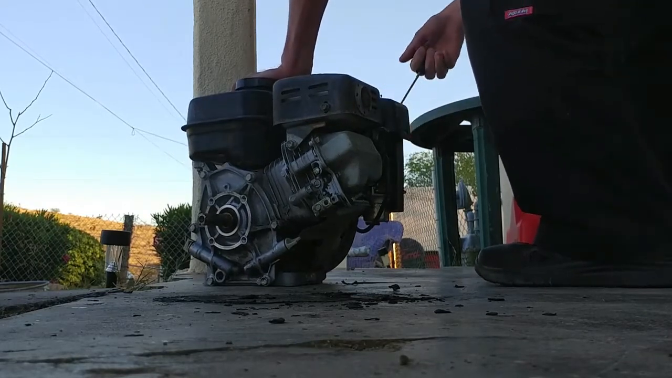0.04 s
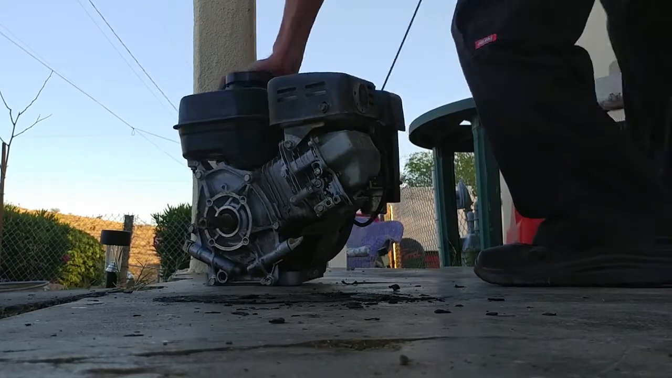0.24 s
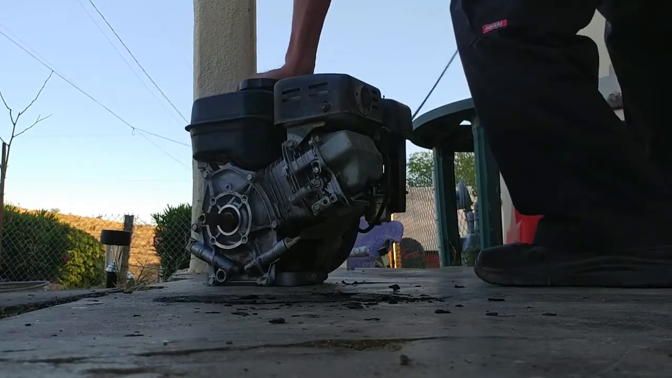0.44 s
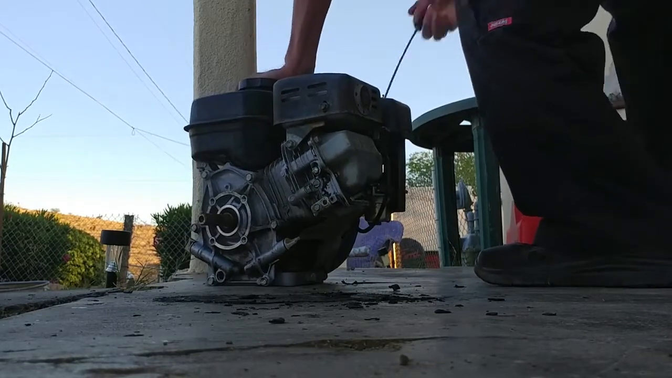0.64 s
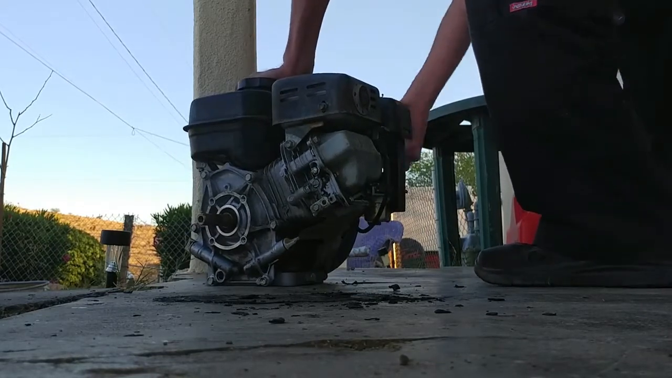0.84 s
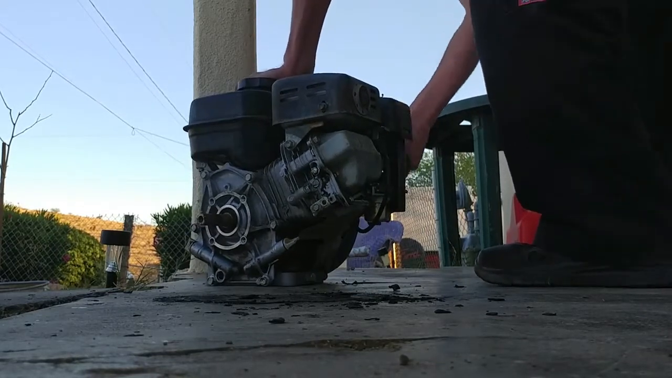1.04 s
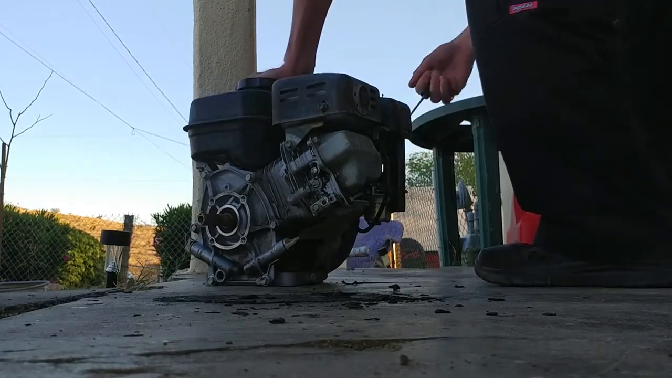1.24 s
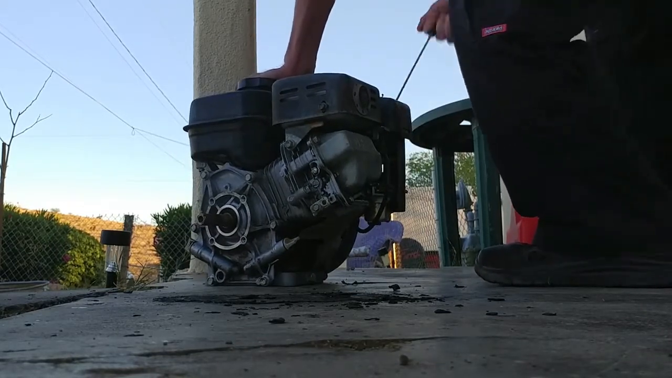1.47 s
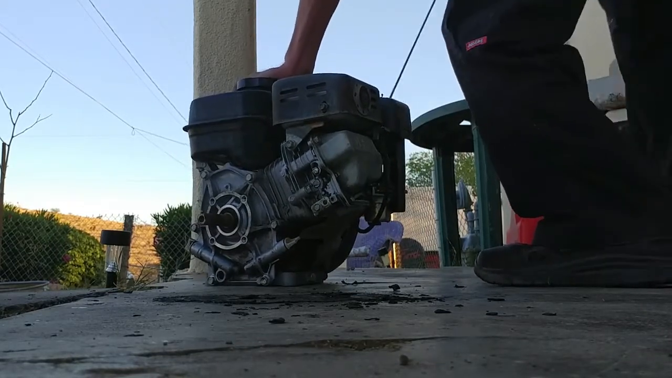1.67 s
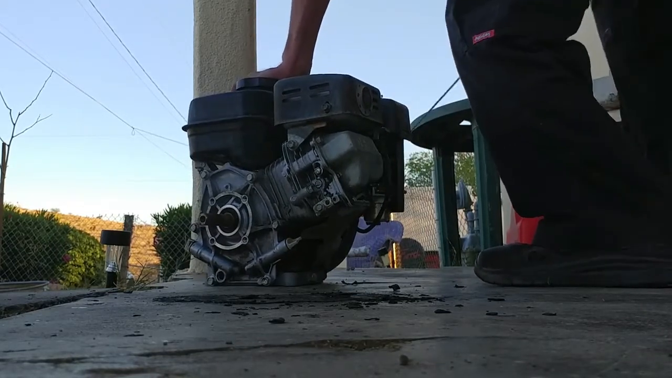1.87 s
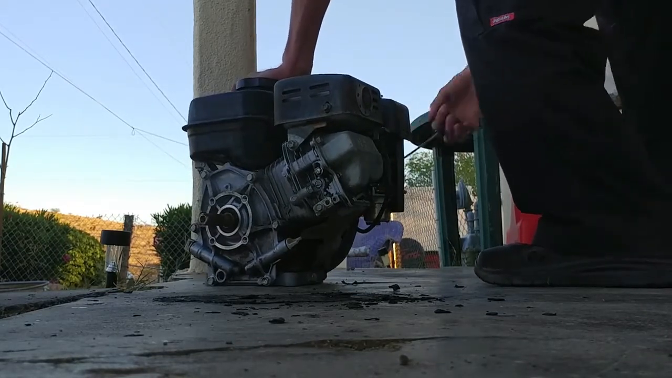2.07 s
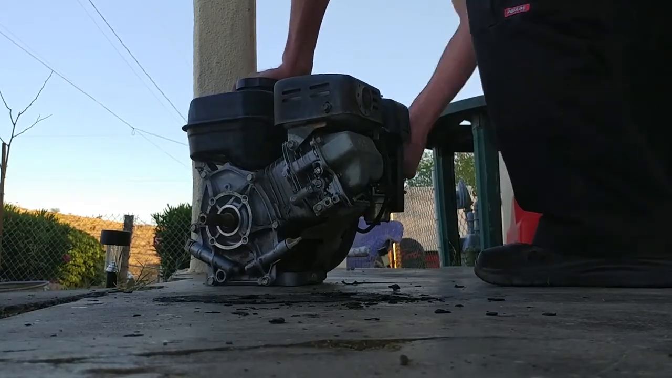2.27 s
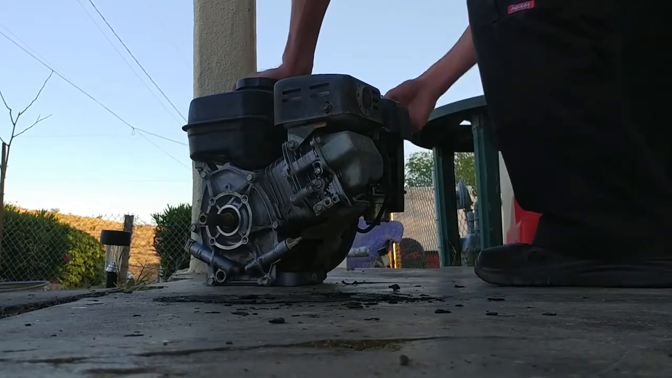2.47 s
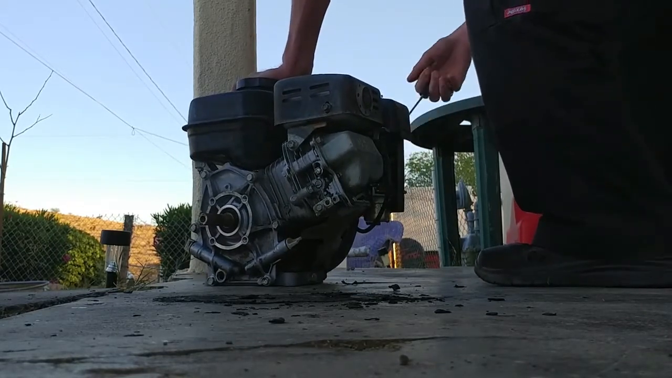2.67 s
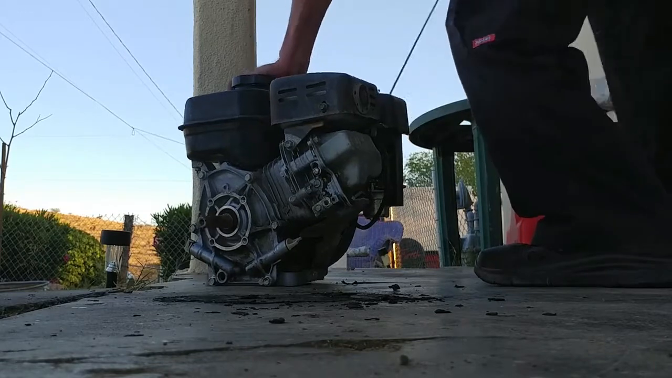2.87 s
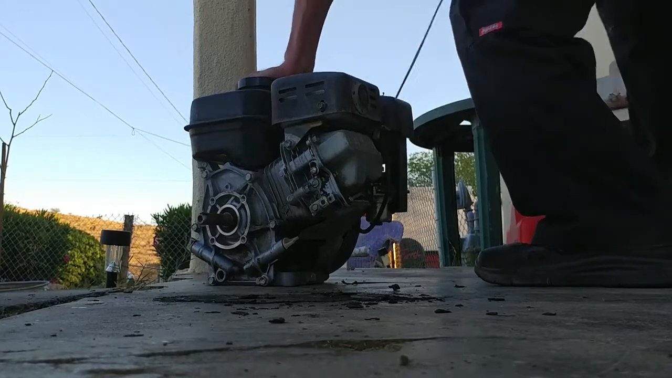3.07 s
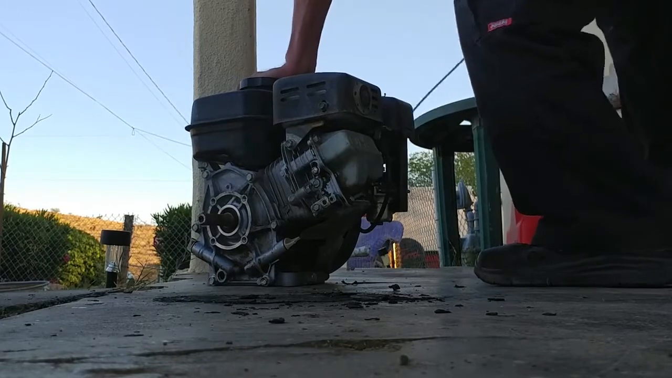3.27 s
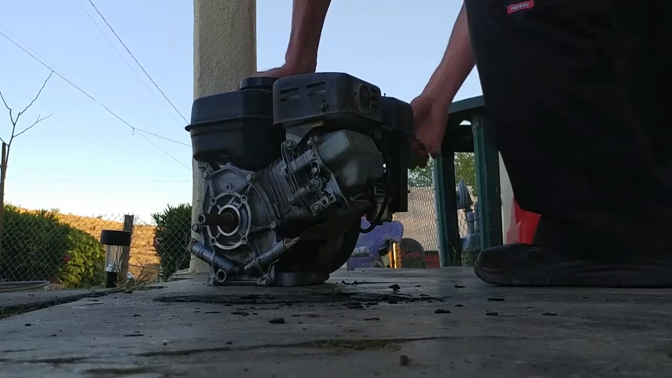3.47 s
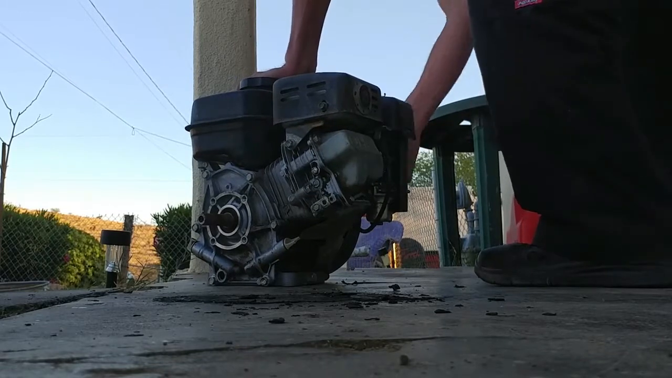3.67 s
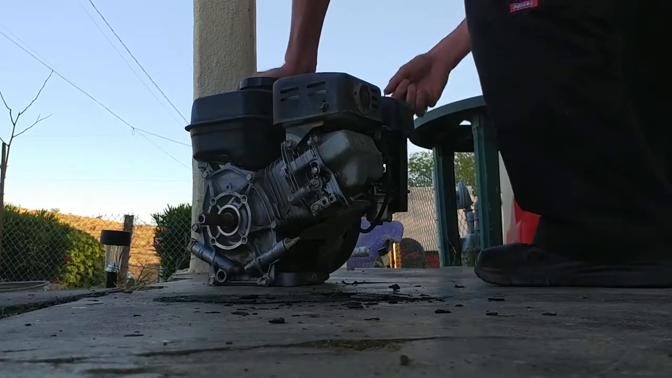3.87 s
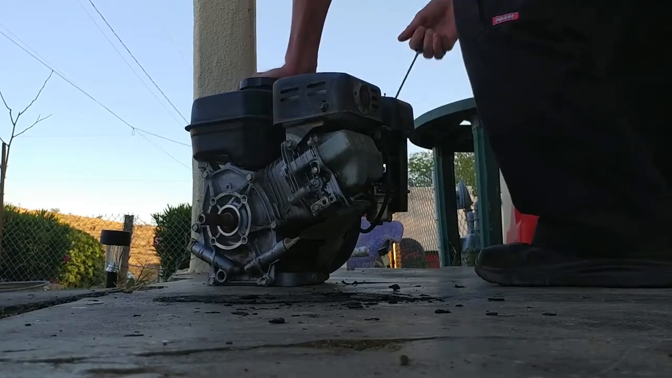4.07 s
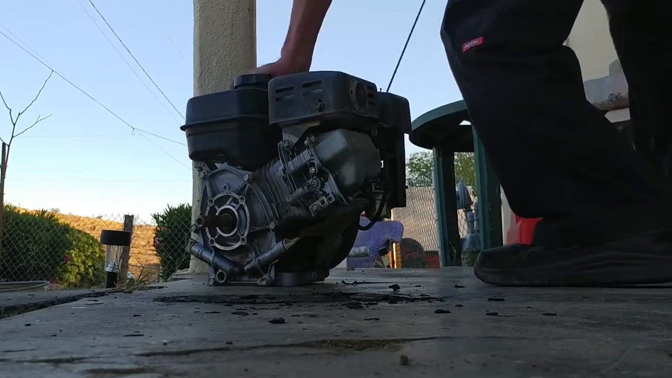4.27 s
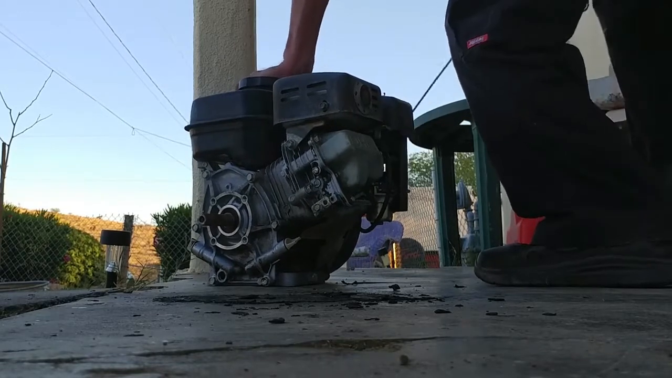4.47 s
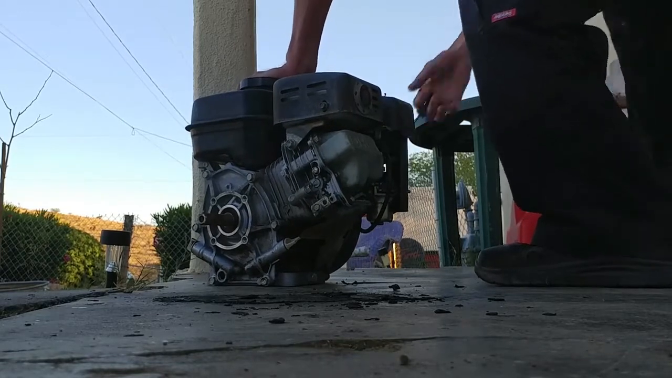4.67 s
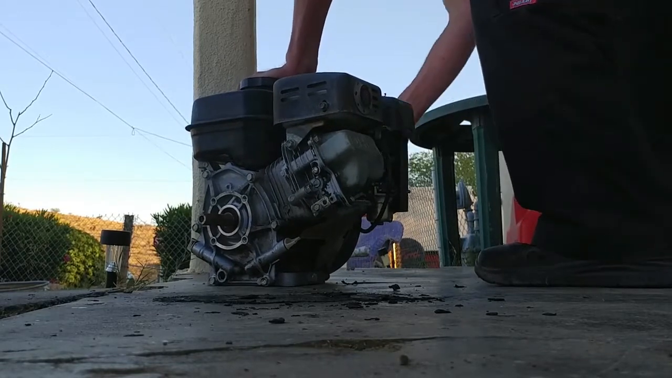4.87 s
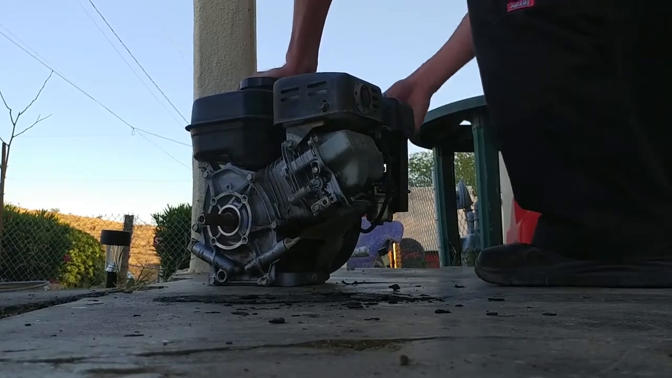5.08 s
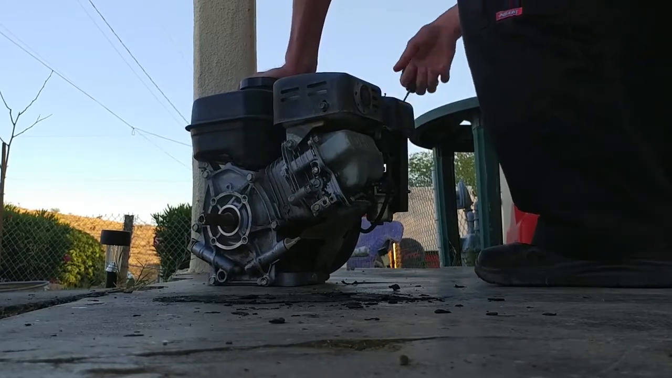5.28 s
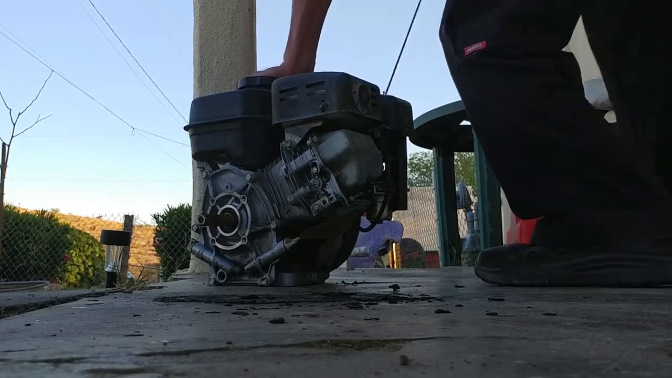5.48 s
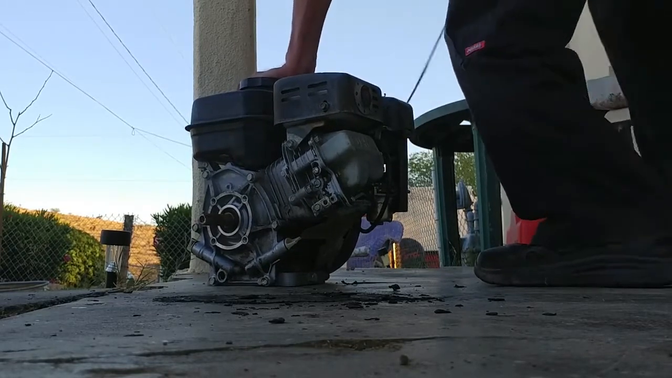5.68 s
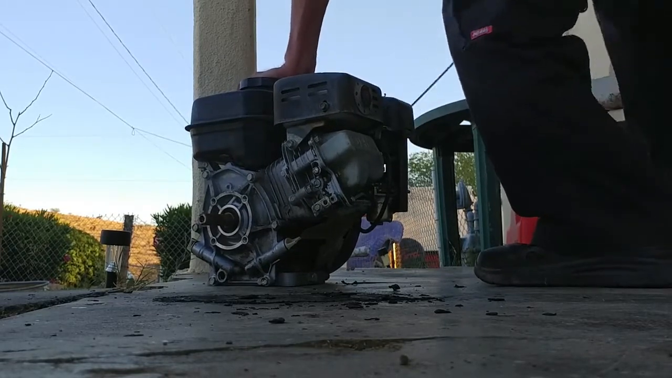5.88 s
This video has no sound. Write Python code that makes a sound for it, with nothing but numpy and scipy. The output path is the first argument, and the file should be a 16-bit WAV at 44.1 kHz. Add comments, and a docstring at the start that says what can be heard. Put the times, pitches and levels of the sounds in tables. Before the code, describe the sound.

Close to a stereo microphone on a concrete patio, someone tries to pull-start a small engine. Five evenly paced pulls each set loose metal rattling and the crank whirring, while the engine judders and thumps against the slab. Small clicks and clinks fill the gaps as it spins down without catching. The last pull is a little weaker, and a faint low outdoor rumble lies underneath.

```python
"""A few light metal clicks, then a burst of clatter: a small single-cylinder engine is pulled over by
its rope five times and does not fire. It stands on a concrete patio, near a two-port stereo microphone.
Pawls, valves and loose sheet metal rattle and ring the housing and the starter cup; the crank whirs,
and the block thuds on the slab at each compression. A low outdoor rumble lies far behind."""
import sys
import numpy as np
from scipy import signal
from scipy.fft import rfft, irfft
from scipy.io import wavfile

SR = 44100
rng = np.random.default_rng(int(sys.argv[2]) if len(sys.argv) > 2 else 0)


def wav_record(signal):
    """Record a signal, one row per channel, as 16-bit PCM in the file named by sys.argv[1]."""
    frames = np.transpose(np.atleast_2d(signal))
    bounded = np.clip(frames, -1, 1)
    # unit amplitude maps onto the largest positive 16-bit level
    quanta = np.round(bounded * 32767).astype(np.int16)
    wavfile.write(sys.argv[1], SR, quanta)


N = 261072

# Likeness of the two microphone ports. Each row: frequency in Hz, share common to both.
PORT_LIKENESS = [(60, 0.98), (250, 0.97), (600, 0.87), (2000, 0.35), (6000, 0.47), (14000, 0.4)]
# Phase between the ports. Each row: frequency in Hz, lead of the left port in radians.
PORT_LEAD = [(600, 0.14), (1200, 0.65), (2000, 0.58), (3270, 0.75), (4650, 2.9), (6000, 0.43), (8100, 2),
             (15000, 5.1)]
# Echoes off slab and post. Each row: delay in seconds, left level in dB, right level in dB.
PATIO_ECHOES = [(0.009, -21, -17), (0.025, -20, -15.5)]

# Noise colours at the microphone. Each row: frequency in Hz, relative spectral density in dB.
OUTDOORS, OUTDOORS_DB = [(88, -23), (150, 1.5), (396, -7.5), (540, -1.5), (2410, -31.5), (3280, -26),
                         (5030, -29.5), (9010, -31), (15500, -61.5)], -55   # far rumble; its rms level
WHIR_COLOUR = [(88, -27.5), (150, 10), (304, -8.5), (761, -6.5), (877, -1.5), (1390, -2), (2910, -18.5),
               (6920, -28), (9170, -19), (10200, -34), (13300, -56.5), (22000, -120)]   # bearings, fan and rope
JUDDER_COLOUR = [(15, -46), (36, -6), (50, 3), (87, 7), (162, -5), (188, -15), (249, -9), (328, -32.5),
                 (365, -12), (400, -23.5), (520, -29), (880, -120)]   # the engine shaking on the slab
KNOCK_COLOUR = [(100, -4.5), (170, -3), (250, 1), (330, -11), (470, -3.5), (900, -30)]   # block against slab
METAL_COLOUR = [(150, -42.5), (250, -10.5), (865, -9), (964, 0.5), (1060, -12), (1160, 3.5), (1300, -5.5),
                (2130, -5.5), (2730, -4.5), (4340, -10.5), (7250, -15), (9150, -7.5), (10200, -22),
                (13300, -51.5), (22000, -120)]   # rattling metal
SIZZLE_COLOUR = [(6060, -27.5), (10300, 9.5), (10600, -9), (10700, -4.5), (11100, -0.5), (13300, 0),
                 (15500, -1.5)]   # sizzle, mostly above 10 kHz

# Ringing bodies. Each row: frequency in Hz, gain in dB, time to fall 60 dB (t60) in seconds.
HOUSING_MODES = [(495.2, -21, 0.27), (893.5, -20, 0.079), (1092, -20, 0.049), (1620, -26, 0.54),
                 (1839, -21, 0.051), (2780, -37.5, .06)]
CUP_RIM_MODES = [(3228, 0, 0.035), (3340, -7, 0.025)]
CUP_WALL_MODES = [(6365, -6.5, 0.045), (6650, -3, 0.041), (8320, -3.5, 0.027), (8820, 2, 0.029),
                  (8860, -8, 0.019)]
SMALL_PART_MODES = [(3650, 3, 0.059), (6160, -8, .03)]

# Rope pulls. Each row: times in seconds of rope bite, compression and a mark SETTLE_S before rest,
# then levels in dB of whir, whir at compression, judder at compression, and hiss relative to whir.
ROPE_PULLS = [(0.231, 0.568, .84, -30.5, -15.5, -14, -1.5), (1.578, 1.9, 2.15, -32.5, -27.5, -21.5, -1.5),
              (2.93, 3.259, 3.425, -30, -27, -13.5, -2.5), (4.242, 4.552, 4.8, -31, -32, -24.5, -1.5),
              (5.5, 5.819, 5.72, -35, -28.5, -32.5, 3.5)]
# The block lands on the slab. Each row: start in seconds, level in dB, knock in dB relative to that.
BLOCK_THUDS = [(0.319, -17, -13), (0.382, -10.5, -25), (0.496, -16.5, -2.5), (0.544, -15, -3.5),
               (0.55, -2.5, -5), (0.59, -10.5, -25), (0.625, -26, -9), (.685, -22.5, -3.5),
               (0.809, -20.5, -7.5), (1.222, -32, -13), (1.713, -18, -26), (1.835, -22, 0),
               (1.9, -11.5, -21.5), (2.061, -18, -13), (2.476, -37, 2), (3.134, -19.5, -16),
               (3.194, -12, -13.5), (3.242, -1.5, -10.5), (3.254, -4, -15.5), (3.436, -30, -3.5),
               (3.709, -21, -15.5), (4.406, -19, -6.5), (4.469, -9.5, -22), (4.527, -25, 6),
               (4.582, -15, -9.5), (4.659, -13.5, -15), (4.893, -26.5, -5), (5.667, -18.5, -4.5),
               (5.723, -8.5, -27), (5.787, -19.5, -4.5), (5.838, -19, -13), (5.908, -8, -40)]
# The housing booms on one tone. Each row: start in seconds, drive in dB, pitch in Hz, hold in seconds.
HOUSING_BOOMS = [(1.214, -41.5, 441, 0.016), (3.203, -25, 906, 0.022), (3.703, -36, 453, 0.021),
                 (5.717, -20, 874, 0.013)]
# The pawls release the cup. Each row: start in seconds, rim drive in dB, wall drive in dB relative
# to the rim, hold in seconds.
CUP_RELEASES = [(0.521, -28, -4, .04), (0.581, -41.5, -18.5, 0.13), (1.875, -32, -2.5, 0.055),
                (1.925, -43.5, -9.5, 0.066), (3.19, -32.5, -4.5, .04), (4.485, -25, -10, 0.063),
                (5.767, -36, -3.5, 0.059)]
# A small part buzzes after a valve tick. Each row: start in seconds, drive in dB, hold in seconds.
PART_BUZZES = [(.755, -46, 0.044), (2.083, -32.5, 0.012), (3.335, -33, .033), (4.91, -52, 0.023),
               (5.675, -28, 0.0093)]
# Bursts of clatter. Each row: start in seconds, metal level in dB, then housing, treble and cup rim
# in dB relative to the metal, rattle length in seconds, nominal decay time in seconds.
CLATTER_BURSTS = [(.056, -37, 7, -20, -4, 0.0056, .08), (.064, -29.5, 4.5, 4, 1.5, 0.005, 0.15),
                  (0.14, -56.5, 5, 4, -12, .016, 0.18), (0.186, -45.5, -8.5, -1.5, -16, .013, 0.34),
                  (0.22, -32, 4.5, -18, -14, 0.018, 0.2), (0.252, -22.5, -4, .5, 2, 0.0057, 0.34),
                  (0.258, -12, 0, 0.5, -19, .027, 0.27), (0.488, -12, -2.5, 0, -16.5, 0.021, .13),
                  (0.519, -19, -13, 1.5, 3, 0.0046, 0.33), (0.574, -20, 7.5, -7, -17, 0.014, .11),
                  (0.684, -28, 2.5, -11, -26, .007, 0.18), (0.726, -23.5, -24, 2.5, -8, 0.0055, 0.3),
                  (0.767, -38, -2, 1.5, -19, 0.028, 0.28), (1.182, -30.5, -16, 2, -13.5, 0.0094, 0.11),
                  (1.216, -45, -13, -3, -27, 0.0054, 0.4), (1.252, -44.5, -0.5, -10, -24, .011, .11),
                  (1.365, -51, -14.5, -7, 8, .005, .15), (1.372, -44.5, 7, -4.5, 0.5, 0.016, 0.27),
                  (1.612, -37.5, -6, 5, 1.5, 0.0064, .26), (1.626, -16, 3.5, 4, -4.5, 0.025, 0.21),
                  (1.77, -31.5, 1.5, -23, -14.5, 0.061, 0.4), (1.835, -21.5, -11, 0.5, -9.5, 0.025, 0.14),
                  (1.869, -15, -1, 1.5, -5.5, 0.016, 0.38), (2.019, -32.5, 2, -5.5, -12, 0.021, 0.12),
                  (2.05, -20.5, -21, -1.5, -16, 0.0053, 0.18), (2.08, -33, 0.5, 1, -22, 0.012, 0.14),
                  (2.243, -32, 3.5, -8.5, -13, 0.0085, 0.36), (2.447, -35.5, -21, 2.5, -8, 0.0083, 0.27),
                  (2.499, -41.5, -16, -1, -9.5, 0.0064, 0.18), (2.619, -55, -1.5, -11.5, -11, .005, .38),
                  (2.733, -47, 5, -14.5, 0, 0.0056, .14), (2.749, -40.5, 3, 1.5, 1, 0.0061, 0.17),
                  (2.835, -59, -4.5, 1, -12, .008, .25), (2.898, -45, 10.5, -8, -17, 0.0043, 0.87),
                  (2.94, -35, -1, -7, 1, 0.013, 0.12), (2.956, -13.5, -0.5, 2.5, -6, 0.02, 0.25),
                  (2.978, -19, 6.5, -3, -17, 0.0089, 0.17), (3.128, -21, -1.5, 0, -14, 0.02, 0.22),
                  (3.184, -16.5, 5, 2.5, -3.5, 0.013, 0.2), (3.234, -15.5, -1, -7.5, -20, 0.0069, 0.29),
                  (3.333, -21.5, -19, 0, -16, 0.0091, 0.23), (3.533, -33.5, 5.5, -3, -21, 0.0092, 0.5),
                  (3.564, -35, -3, -7, -22, 0.024, .11), (3.598, -35.5, 5.5, -7, -31, 0.0053, .064),
                  (3.682, -30.5, -11, 4.5, -0.5, 0.0038, 0.21), (3.718, -40.5, 0, -0.5, -8.5, .014, 0.28),
                  (3.963, -55, -4, 2.5, -12.5, 0.0043, .21), (4.004, -56, 6.5, -16, -6.5, .005, 0.24),
                  (4.069, -41, -13, -9, -2, 0.0043, 0.1), (4.078, -34.5, 3.5, 6.5, 4, 0.0075, 0.23),
                  (4.209, -48, 3, -4.5, -9, 0.0087, 1), (4.238, -17, 3.5, 5, 1.5, 0.0028, 0.3),
                  (4.36, -36.5, -3, 2.5, -20, 0.034, .2), (4.404, -22, -5.5, 2, -11.5, 0.029, 0.3),
                  (4.48, -21, 2, 2.5, -6.5, 0.022, .23), (4.517, -21, 2.5, -1, -15, 0.019, 0.11),
                  (4.591, -20, -9, -0.5, -12, 0.0063, 0.39), (4.819, -40.5, 7.5, -18, -19, 0.0045, .16),
                  (4.841, -35.5, 3, -5, -36, 0.0048, 0.7), (4.876, -26, -20, 2.5, -3.5, 0.0032, 0.3),
                  (5.235, -58, -0.5, -3, -23, .005, .6), (5.265, -59, 2, -5, -22, 0.0047, .2),
                  (5.331, -42.5, 6.5, -10, -2.5, 0.02, 0.27), (5.355, -31.5, 3.5, -6.5, -1.5, 0.0048, .14),
                  (5.539, -26, 6.5, -9, -20.5, .011, 0.28), (5.562, -40.5, 11, 1, -22, 0.035, .15),
                  (5.62, -49, -.5, -4, -24, .005, .16), (5.649, -31, 11, -16, -11, .006, 0.17),
                  (5.663, -19, -4.5, -1, -17, 0.024, 0.25), (5.719, -16.5, -1.5, -2.5, -23, 0.0097, 0.24),
                  (5.764, -33.5, 2, 7.5, 0, 0.025, 0.97), (5.819, -23.5, -5, -14, -11, 0.03, 0.22),
                  (5.843, -25.5, -9, 1.5, -17, 0.026, 0.091)]

SPIN_UP_S, SURGE_S, SETTLE_S = 0.083, .08, 0.27   # gaining speed, passing compression, coming to rest
AFTER_DB, COAST_DB_PER_S, REST_DB = -2.5, 40.5, -63   # whir: step past compression, coasting fall, rest
HISS_FOLLOWS, HISS_LEAST_DB = 0.71, -21   # hiss share lost per dB off the steady whir; lowest share
JUDDER_REST_DB, JUDDER_TURN_DB, JUDDER_AFTER_DB = -38.5, -33, -28.5   # still, turning, past compression
THUD_HZ, THUD_SPREAD = 91.6, 0.027   # the block on its feet; the pitch varies with how it lands
THUD_T60_S, KNOCK_DECAY_S, BOOM_T60_S, DRIVE_DECAY_S = .16, 0.25, 0.058, 0.036
MID_HZ, HIGH_HZ = 1500, 5000   # where housing, metal and treble bands meet
CRACK_DB, CRACK_LOSS, CRACK_THIN = -3, 0.53, .4   # crack over rattle; loss per dB of rim, of housing
WALL_DB, WALL_STEEPER = -6, 1.3   # cup wall relative to the metal; dB it moves per dB of rim
FREE_LONGER = 3.5   # the free rim rings this many times longer than when the pawls hold it
PARTS_TILT_DB = -.5   # each loose part relative to the next larger one


def from_db(db):
    """Gain of a level in dB."""
    return 10 ** (np.asarray(db) / 20)


def rms_one(x):
    """Signal scaled to rms 1."""
    return x / np.sqrt(np.mean(x ** 2) + 1e-20)


def drift(rate_hz):
    """Smooth random wander, rms 1."""
    pole = np.exp(-2 * np.pi * rate_hz / SR)
    return rms_one(signal.lfilter([1], [1, -2 * pole, pole * pole], rng.standard_normal(N + SR))[SR:])


def port_noise(spectrum):
    """Coloured noise at the two microphone ports: partly shared, shifted in phase; rms 1."""
    hz = np.arange(N // 2 + 1) * SR / N + 1
    colour_hz, db = np.transpose(spectrum)
    likeness_hz, likeness = np.transpose(PORT_LIKENESS)
    lead = np.interp(hz, *np.transpose([(0.022, 0)] + PORT_LEAD))
    shared = np.clip(np.interp(np.log(hz), np.log(likeness_hz), likeness), 0, 1)
    left, other = rfft(rng.standard_normal((2, N)))
    right = (shared * left + np.sqrt(1 - shared ** 2) * other) * np.exp(-1j * lead)
    colour = from_db(np.interp(np.log(hz), np.log(colour_hz), db, left=-90, right=-90))
    return rms_one(irfft(colour * np.array([left, right]), N))


def band(x, low_hz, high_hz):
    """One frequency band, rms 1."""
    return rms_one(signal.sosfilt(signal.butter(3, [low_hz, high_hz], "band", fs=SR, output="sos"), x))


def ring(drive, hz, t60):
    """One damped mode; white noise of rms 1 gives about rms 1."""
    r, w = from_db(-60 / (t60 * SR)), 2 * np.pi * hz / SR
    feedback = [1, -2 * r * np.cos(w), r * r]
    return signal.lfilter([0, 2 * np.sqrt(1 - r) * np.sin(w)], feedback, drive + 1e-18)


def struck(drive, modes):
    """All modes of one body under the same drive."""
    return sum(from_db(db) * ring(drive, hz, t60) for hz, db, t60 in modes)


def bursts(starts, levels_db, holds, decays, attack_s=.0012):
    """Envelope of bursts that rise fast, hold and die away ever faster; their powers add."""
    power = np.zeros(N)
    for at, db, hold, decay in np.broadcast(starts, levels_db, holds, decays):
        start = round(at * SR)
        t = np.arange(min(SR // 2, N - start)) / SR
        late = np.maximum(t - hold, 0) / max(decay, .01)
        shape = (1 - np.exp(-t / attack_s)) * from_db(db - 60 * late - 180 * late ** 2)
        power[start:start + len(t)] += shape ** 2
    return np.sqrt(power)


def outdoors():
    """Steady low rumble from far beyond the patio."""
    return from_db(OUTDOORS_DB) * port_noise(OUTDOORS)


def patio(direct):
    """Direct sound plus dull echoes off slab and post, each reaching the opposite port."""
    dull, out = signal.lfilter([.6], [1, -.4], direct), direct.copy()
    for delay, left_db, right_db in PATIO_ECHOES:
        lag = round(delay * SR)
        out[:, lag:] += from_db([[left_db], [right_db]]) * dull[::-1, :-lag]
    return out


def loose_parts(envelope, per_s, parts=14):
    """Random clinks dealt to small metal parts, each with its own pitch and stereo polarity."""
    clicks = envelope * (rng.random(N) < per_s / SR)
    clicks *= from_db(2.5 * np.minimum(rng.exponential(1, N), 3))
    dealt, out = rng.integers(0, parts, N), np.zeros((2, N))
    for k, hz in enumerate(np.geomspace(550, 4500, parts)):
        detune, lean = rng.uniform(-1, 1, 2)
        clink = ring(clicks * (dealt == k), hz * (1 + .04 * detune), t60=52.0 / hz)
        out += from_db(PARTS_TILT_DB * k) * clink * np.array([[1], [np.sign(lean + .5)]])
    return out


def rope_pulls():
    """Whir, hiss share and judder in dB: four pulls coast and settle; the fifth whirs briefly and fades."""
    knots = []
    for bite, squeeze, mark, steady_db, surge_db, shake_db, hiss_db in ROPE_PULLS:
        mark_db = steady_db + AFTER_DB - COAST_DB_PER_S * (mark - squeeze - SURGE_S)
        stages = [(bite, REST_DB, JUDDER_REST_DB),
                  (bite + SPIN_UP_S, steady_db, JUDDER_TURN_DB),
                  (squeeze - SURGE_S, steady_db, JUDDER_TURN_DB),
                  (squeeze, surge_db, shake_db),
                  (squeeze + SURGE_S, steady_db + AFTER_DB, JUDDER_AFTER_DB),
                  (mark, mark_db, JUDDER_TURN_DB),
                  (mark + SETTLE_S, REST_DB, JUDDER_REST_DB)]
        for at, whir_db, judder_db in stages:
            share_db = max(hiss_db - HISS_FOLLOWS * abs(steady_db - whir_db), HISS_LEAST_DB)
            knots.append((at, whir_db, share_db, judder_db))
    times, *curves = np.transpose(knots)
    return (np.interp(np.arange(N) / SR, times, curve) for curve in curves)


def crank():
    """Bearings, fan and rope whir and hiss; loose parts clink and the engine judders on the slab."""
    whir_db, hiss_db, judder_db = rope_pulls()
    ticking = port_noise(WHIR_COLOUR) * from_db(1.7 * drift(63) + 0.83 * drift(400))
    whir = from_db(whir_db) * band(ticking, 180, 2700)
    hiss_gain = from_db(whir_db + hiss_db)
    hiss = hiss_gain * band(ticking, 2300, 13000)
    sizzle = from_db(3.0) * hiss_gain ** 1.41 * port_noise(SIZZLE_COLOUR)
    clinks = from_db(14.5) * loose_parts(hiss_gain, per_s=2000)
    judder = from_db(judder_db) * port_noise(JUDDER_COLOUR)
    return whir + from_db(-1.0) * struck(whir, HOUSING_MODES) + hiss + sizzle + clinks + judder


def block_thuds():
    """The block lands on the concrete: a damped low swing with a rough knock above it."""
    starts, db, knock_db = np.transpose(BLOCK_THUDS)
    swings, t = np.zeros(N + SR), np.arange(SR // 2) / SR
    for at, level_db in zip(starts, db):
        hz = THUD_HZ * (1 + THUD_SPREAD * rng.standard_normal())
        swing = np.sin(2 * np.pi * hz * t) * (1 - np.exp(-t / 0.0046))
        swings[round(at * SR):][:len(t)] += from_db(level_db - 60 * t / THUD_T60_S) * swing
    knocks = bursts(starts, db + knock_db, holds=0.016, decays=KNOCK_DECAY_S, attack_s=0.0017)
    return swings[:N] + knocks * band(port_noise(KNOCK_COLOUR), 150, 700)


def small_part_buzz(drive):
    """A small part rings briefly under a run of contacts."""
    starts, db, holds = np.transpose(PART_BUZZES)
    return struck(bursts(starts, db, holds, DRIVE_DECAY_S) * drive, SMALL_PART_MODES)


def housing_booms(contacts):
    """Short pushes of rough noise each ring one tone of the housing."""
    drive = port_noise([(300, 0.0051), (4000, 0)]) * contacts
    return sum(ring(bursts([at], db, hold, decays=.03) * drive, hz, BOOM_T60_S)
               for at, db, hz, hold in HOUSING_BOOMS)


def free_cup(drive):
    """The pawls let go: the starter cup's rim and wall ring, the rim longer than when held."""
    starts, db, wall_db, holds = np.transpose(CUP_RELEASES)
    free_modes = [(hz, gain_db, FREE_LONGER * t60) for hz, gain_db, t60 in CUP_RIM_MODES]
    rim = struck(bursts(starts, db, holds, DRIVE_DECAY_S) * drive, free_modes)
    wall = struck(bursts(starts, db + wall_db, holds, DRIVE_DECAY_S) * drive, CUP_WALL_MODES)
    return rim + wall


def clatter():
    """Pawls, valves and sheet metal: a crack, then a flurry of contacts that rings housing and cup."""
    starts, db, housing_db, treble_db, rim_db, holds, decays = np.transpose(CLATTER_BURSTS)
    crack_db = CRACK_DB - CRACK_LOSS * rim_db - CRACK_THIN * housing_db
    wall_db = WALL_DB + WALL_STEEPER * rim_db   # on dull blows the wall fades faster than the rim
    contacts = from_db(0.66 * drift(300) + drift(60))
    metal_noise = port_noise(METAL_COLOUR) * contacts
    bright_drive = port_noise([(2000, 0.0012), (11000, 0.011)]) * contacts

    def crack_and_rattle(level_db, decay_scale):
        """Envelope of a sharp first contact and the rattle behind it."""
        crack = bursts(starts, level_db + crack_db, holds=0, decays=.01, attack_s=0.00025)
        return np.hypot(crack, bursts(starts, level_db, holds, decay_scale * decays))

    housing_gain = bursts(starts, db + housing_db, holds, 0.9 * decays, attack_s=0.0037)
    housing = housing_gain * band(metal_noise, 320, MID_HZ)
    metal = crack_and_rattle(db, decay_scale=0.89) * band(metal_noise, MID_HZ, HIGH_HZ)
    treble_gain = crack_and_rattle(db + treble_db, decay_scale=0.77)
    treble = treble_gain * band(metal_noise, HIGH_HZ, 9600)
    # sizzle above 10 kHz, louder with the treble level
    sizzle = from_db(-0.5) * treble_gain ** 1.44 * port_noise(SIZZLE_COLOUR) * contacts
    housing_ring = struck(housing + metal, HOUSING_MODES) + housing_booms(contacts)
    clinks = from_db(7) * loose_parts(bursts(starts, db, holds, decays), per_s=1500)
    rim = struck(bursts(starts, db + rim_db, holds, 0.17 * decays) * bright_drive, CUP_RIM_MODES)
    wall = struck(bursts(starts, db + wall_db, holds, 0.35 * decays) * bright_drive, CUP_WALL_MODES)
    cup = rim + wall + free_cup(bright_drive)
    buzz = small_part_buzz(bright_drive)
    return housing + metal + treble + sizzle + housing_ring + clinks + cup + buzz


def scene():
    """The engine near the microphone on the patio, the outdoors far behind."""
    return patio(clatter() + block_thuds()) + crank() + outdoors()


def record(dry):
    """Deep bass is cut, the treble has a narrow dip near 10.6 kHz, peaks overload, the top is cut."""
    bass_cut = signal.butter(4, 42, "high", fs=SR, output="sos")
    treble_dip = signal.butter(2, [10250, 11000], "bandstop", fs=SR, output="sos")
    top_cut = signal.cheby2(12, 60, 15650, fs=SR, output="sos")
    thin = signal.sosfilt(treble_dip, signal.sosfilt(bass_cut, dry))
    overloaded = np.clip(1.566 * np.tanh(thin / 1.675), -1, 1)
    return np.clip(signal.sosfilt(top_cut, overloaded), -1, 1)


dry = scene()
out = record(dry)
wav_record(out)
```